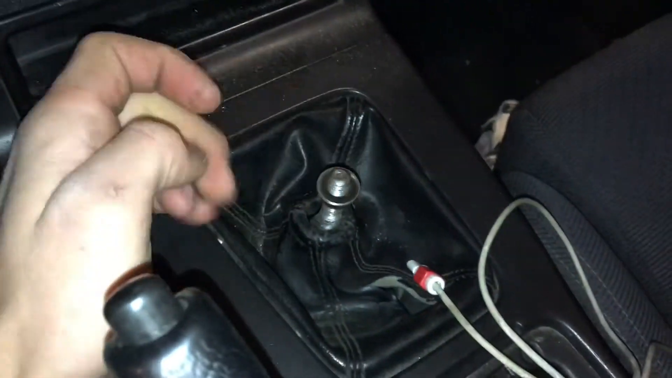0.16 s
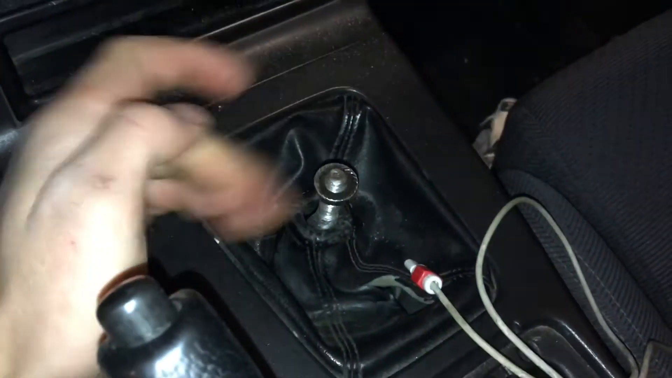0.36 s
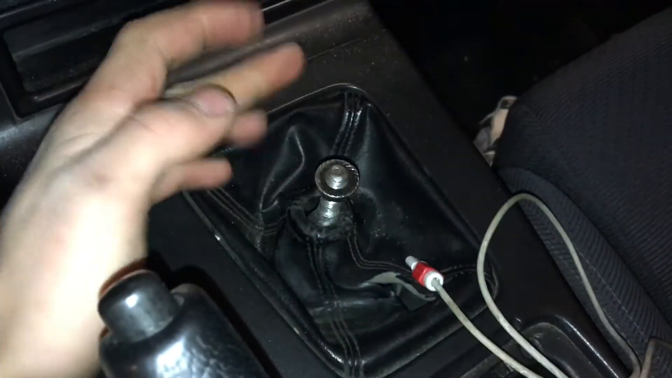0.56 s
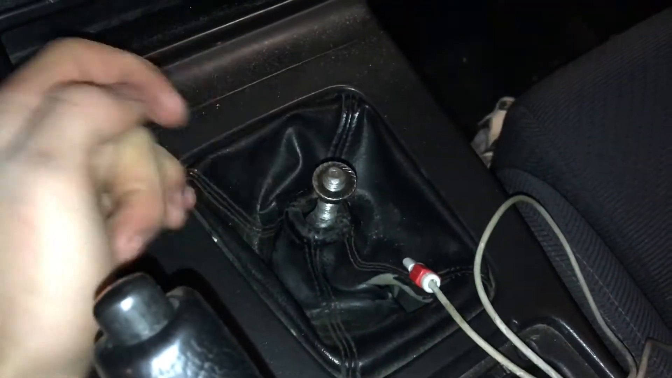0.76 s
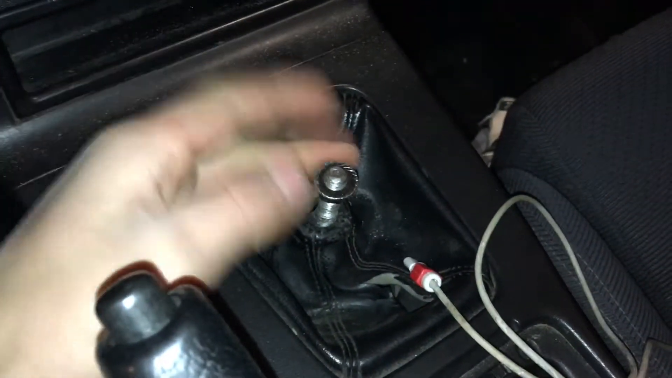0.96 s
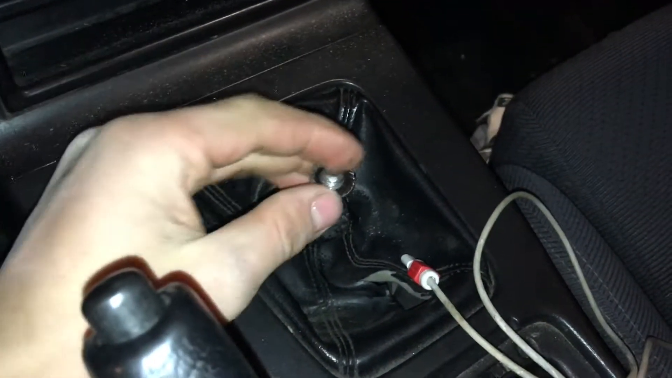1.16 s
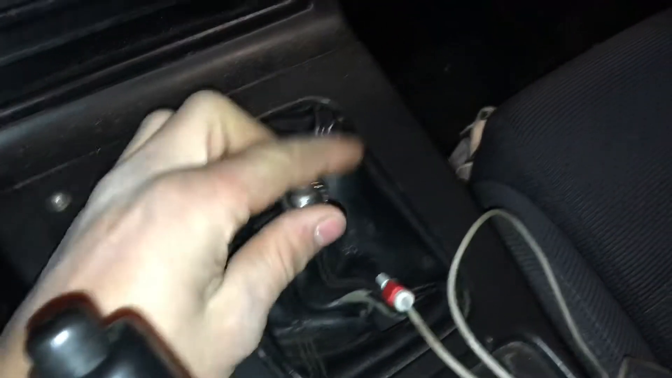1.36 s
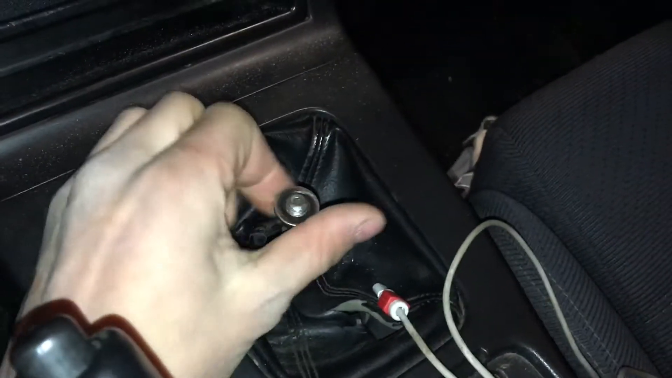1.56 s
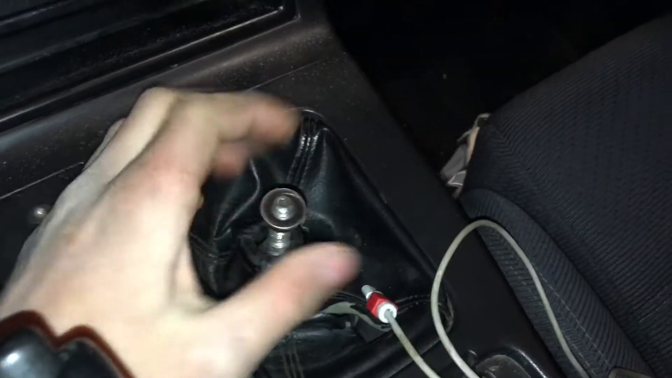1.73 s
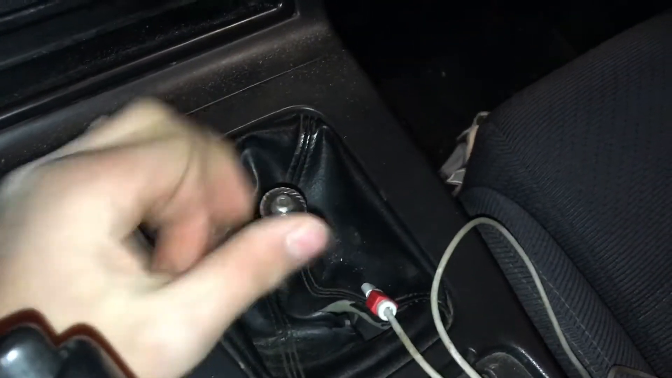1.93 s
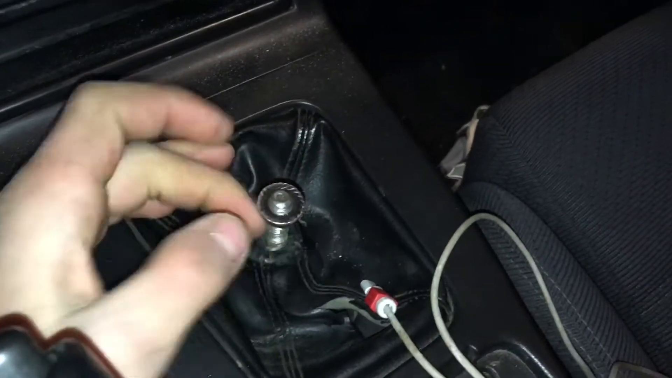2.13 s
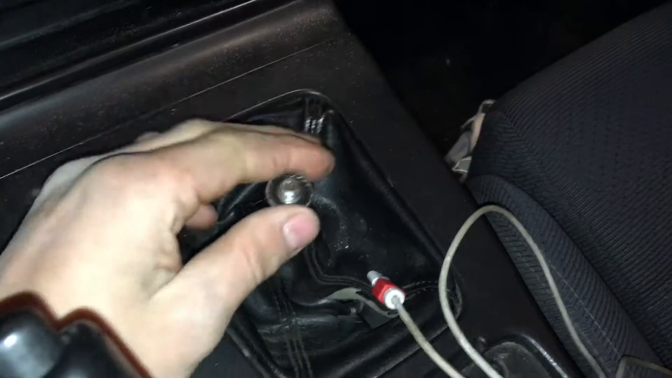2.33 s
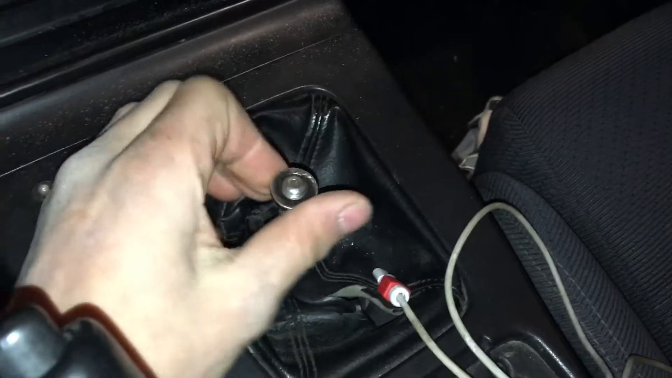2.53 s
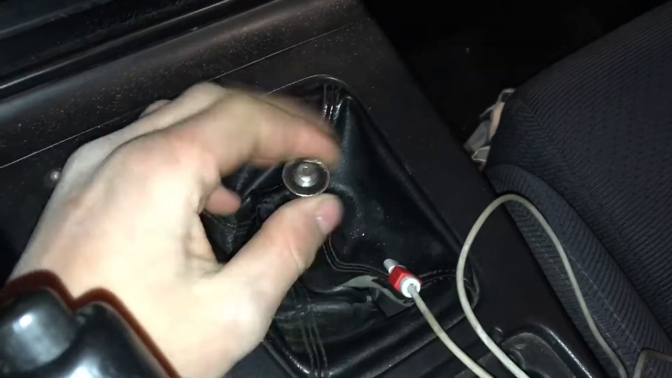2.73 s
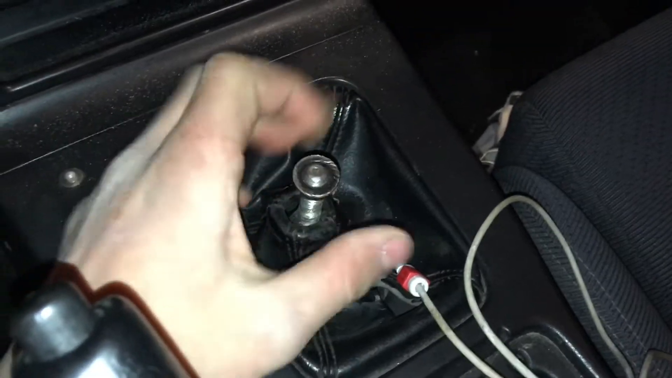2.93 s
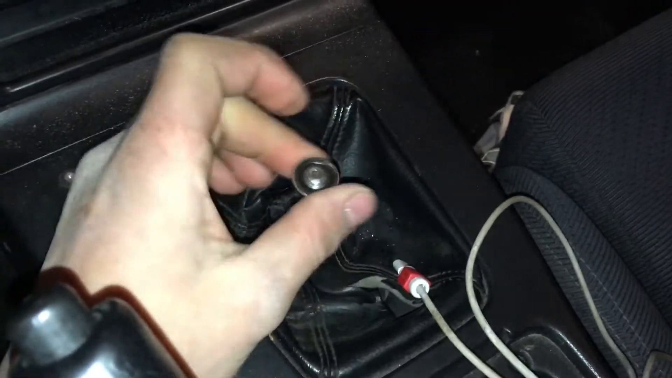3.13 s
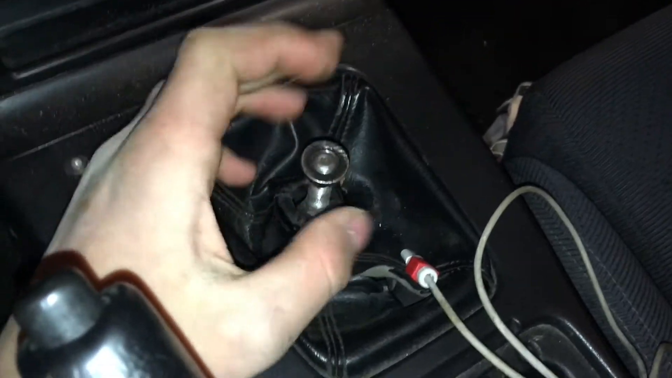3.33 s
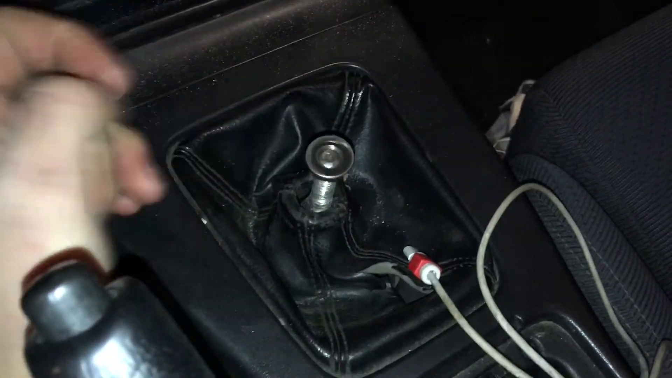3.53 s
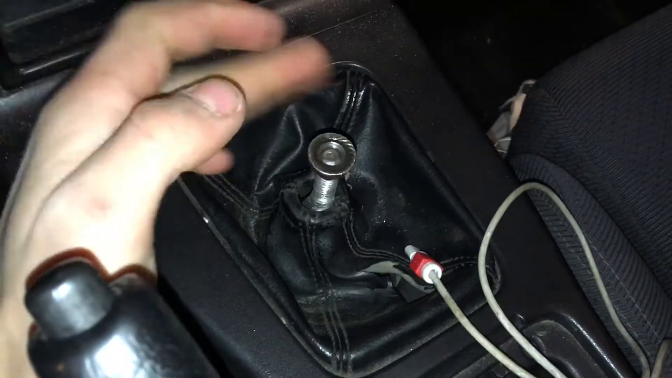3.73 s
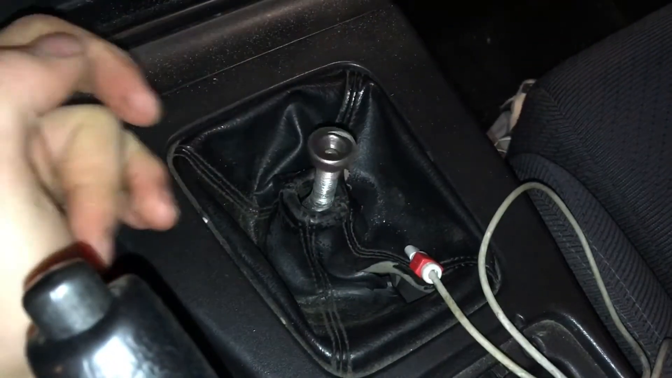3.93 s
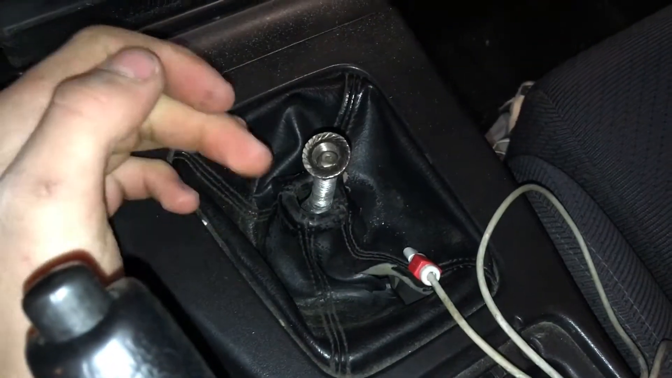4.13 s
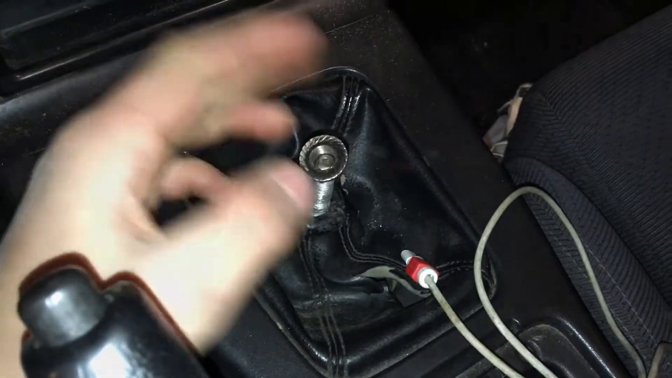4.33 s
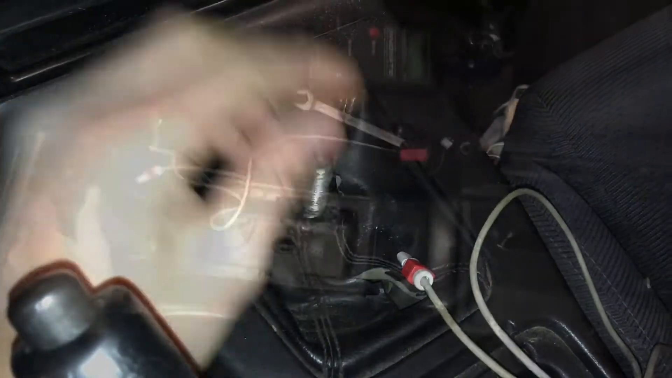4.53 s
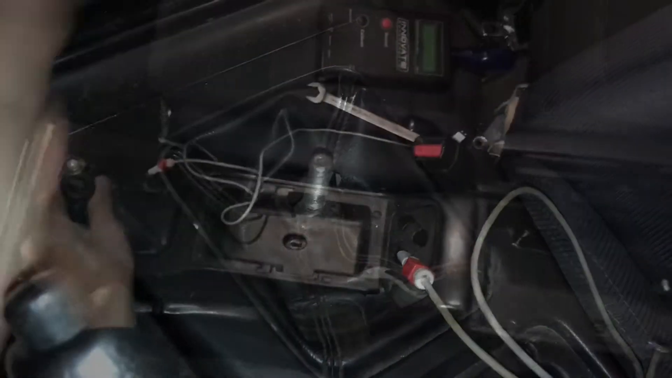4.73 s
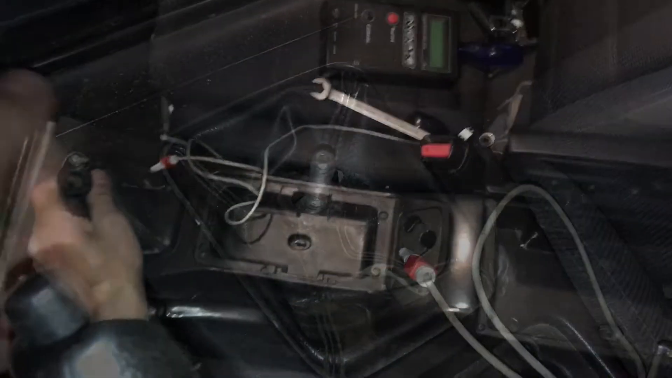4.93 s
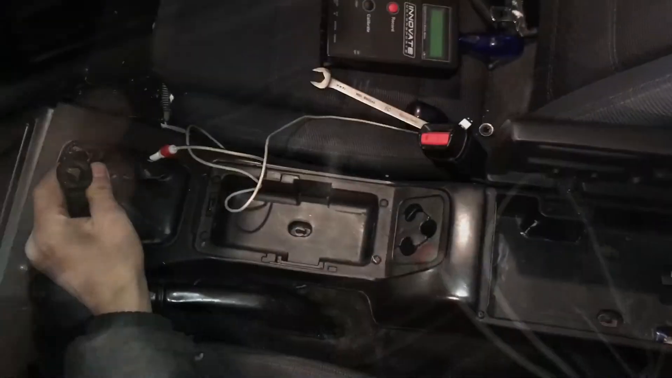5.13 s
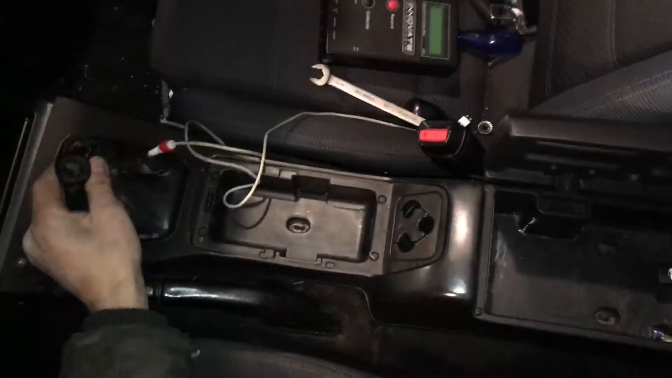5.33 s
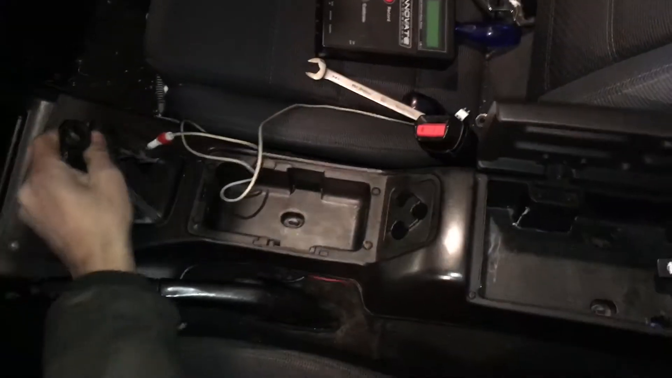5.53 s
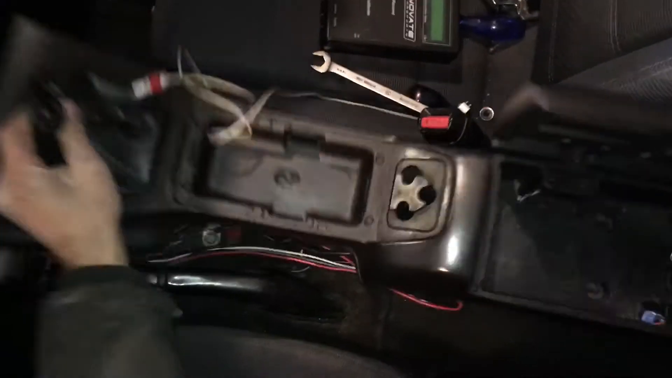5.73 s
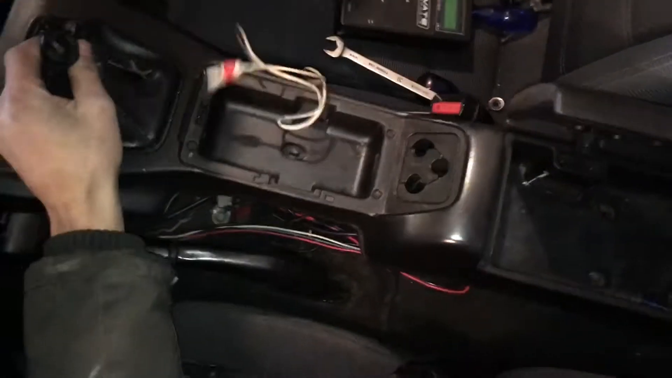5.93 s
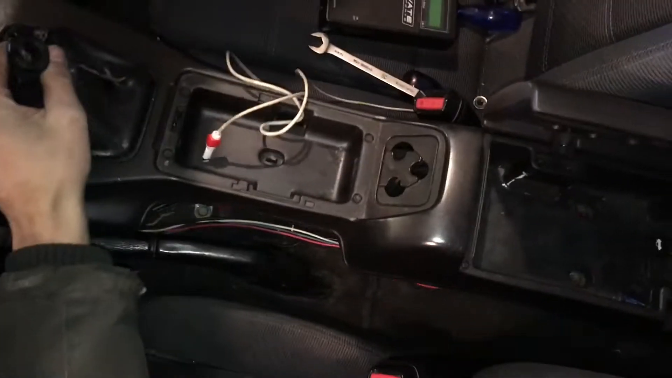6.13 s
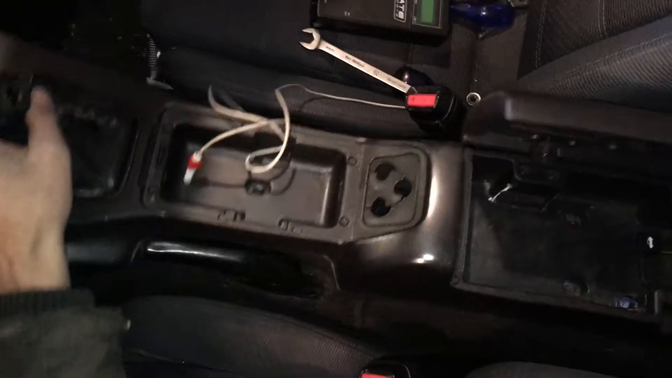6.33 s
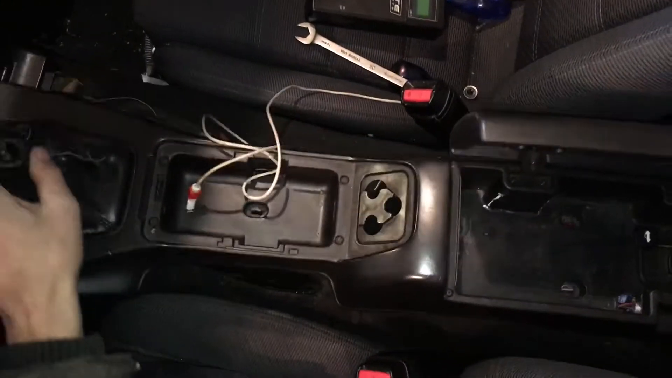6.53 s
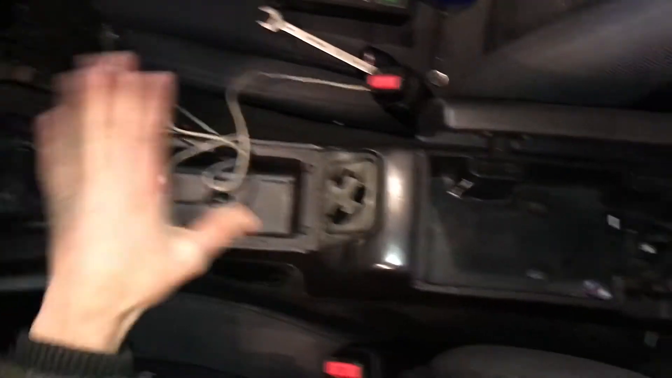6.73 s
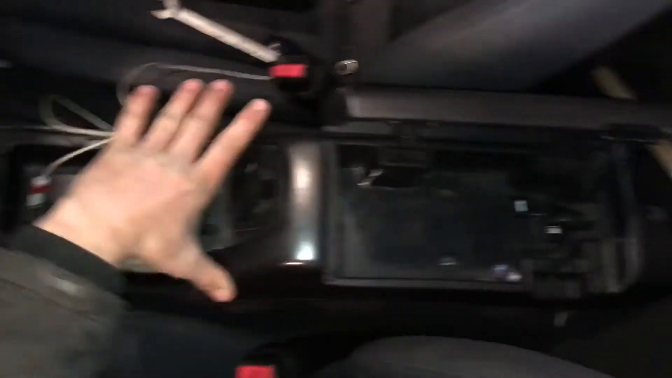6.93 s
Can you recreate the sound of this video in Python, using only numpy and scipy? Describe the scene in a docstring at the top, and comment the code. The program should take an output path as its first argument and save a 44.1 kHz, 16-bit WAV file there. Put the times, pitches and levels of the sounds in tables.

```python
"""A small steel collar ticks and rasps as fingers spin it on the threaded gear lever of a parked car.
Each tick is a burst of noise plus ringing steel; the rasp is noise shaped by many tiny slips.
Then the plastic centre console is tugged: it drags, jolts free, its retaining clips snap, an edge creaks
and it drops back with a thud, made from rubbing noise, knocks and low ringing tones.
The padded cabin answers briefly; fingers brush past; a hand-held camera adds low rumble and hiss."""
import sys
import numpy as np
from scipy import signal
from scipy.fft import rfft, irfft, next_fast_len
from scipy.io import wavfile
from scipy.ndimage import uniform_filter1d, minimum_filter1d, map_coordinates

SR = 44100
rng = np.random.default_rng(int(sys.argv[2]) if len(sys.argv) > 2 else 0)


def inscribe(sig):
    """Save sig as 16-bit PCM at rate SR to the path in sys.argv[1].

    A 1-D sig is mono; a 2-D sig holds one channel per row.
    Samples are clipped to [-1, 1] before scaling.
    """
    pcm = np.round(np.clip(np.atleast_2d(sig).T, -1, 1) * 32767)
    wavfile.write(sys.argv[1], SR, pcm.astype(np.int16))


N = 311586  # samples, about 7 seconds

# Levels in the tables are starting values: the functions add fixed trims and random variation.
# the collar is flicked or catches on the thread: start_s, level_db, pitch_hz, tilt_db_per_octave, ring_db
COLLAR_TICKS = [(.099, -36.5, 7040, -16, -23), (0.186, -23.5, 5640, 0, 11), (0.3597, -33.5, 5300, -11, -8),
                (1.6517, -26, 6600, -7, 22), (1.704, -29, 5500, -2.5, 6), (1.7891, -25, 6740, -3, 0.5),
                (1.881, -27.5, 6600, -4, -9.5), (2.5512, -38, 6570, -5, -2), (2.707, -20, 6680, -6, -2.5),
                (2.7784, -33, 8550, -9, -1), (2.7905, -26, 5600, -5, -15), (2.851, -17, 6340, -3.5, -3),
                (3.0194, -36, 6570, -10, 1), (3.1478, -30.5, 8270, -9, 2), (3.1744, -13.5, 5700, 0, 4),
                (3.1925, -18, 5530, 5, 12), (3.222, -18, 5600, 6, 2), (3.4018, -16, 6230, -3.5, -5.5),
                (3.483, -18.5, 5570, 8, 1), (3.7698, -14, 6970, -3, -9.5), (3.8284, -17.5, 5700, -3, -1.5),
                (3.84, -16.5, 5650, 5, -13), (3.8864, -21.5, 5700, -4.5, 3), (3.9571, -18.5, 6300, -3.5, 5),
                (4.4873, -17.5, 6360, 1, -1)]
# blows on the plastic console: start_s, level_db, treble_db (higher is brighter), pitch_hz
CONSOLE_KNOCKS = [(0.901, -41.5, -30, 1110), (.997, -31.5, -20.5, 732), (1.154, -46.5, -40, 700),
                  (1.94, -35.5, -27, 886), (2.452, -39.5, -23.5, 1226), (2.963, -34.5, -17.5, 1260),
                  (3.045, -43, -12, 1425), (3.298, -42, -30, 1260), (4.367, -42.5, -29, 1070),
                  (4.552, -33, -39, 463), (4.561, -38.5, -9, 580), (4.743, -37, -38, 407),
                  (4.893, -32, 1, 446), (4.987, -37, -29, 537), (5.081, -27.5, -17, 415),
                  (5.122, -34.5, -7, 1730), (5.203, -20.5, -12, 1980), (5.389, -28, -52, 480),
                  (5.449, -24, -31, 1030), (5.483, -25.5, -29, 1060), (5.505, -20, -10.5, 1317),
                  (5.53, -25.5, -24, 490), (5.561, -22.5, -13, 2174), (5.661, -16.5, -28.5, 1035),
                  (5.675, -12.5, -13, 2280), (5.687, -16, -14, 392), (5.698, -12, -20, 430),
                  (5.714, -15.5, -17, 1320), (5.75, -10, -14.5, 1307), (6.283, -32, -16.5, 1370),
                  (6.464, -21, -24, 1133), (6.471, -16.5, -25.5, 1940), (6.484, -18.5, -32.5, 687),
                  (6.495, -5.5, -18.5, 834), (6.889, -29, -28, 987), (6.942, -29.5, -24, 1164)]
# retaining clips let go: start_s, level_db, tilt_db_per_octave, ring_db
CLIP_SNAPS = [(5.9116, -25.5, -8.5, -2), (5.957, -29, -18, -10.5), (5.9638, -8.5, -1.5, -9.5),
              (6.023, 0, 1, -0.5), (6.0643, -16.5, -3.5, 2), (6.241, -37, -10, 2)]
# the whole console is shoved: start_s, level_db
CONSOLE_THUMPS = [(0.44, -40), (.705, -37), (0.971, -36), (1.634, -37), (1.914, -35.5), (1.984, -39.5),
                  (2.977, -39), (3.773, -45), (4.552, -45), (5.003, -34), (5.68, -9.5), (5.713, -15.5),
                  (5.753, -21), (6.496, -15.5), (6.524, -14), (6.927, -30.5)]

# ringing tones of the steel collar: pitch_hz, level_db, decay_s (time to fall 60 dB)
STEEL_MODES = [(1344, -18.5, 0.06), (4600, -21, 0.0045), (5720, -20, 0.12), (6490, -10, 0.047),
               (8400, -22, 0.055)]
# ringing tones of a retaining clip: pitch_hz, level_db, decay_s
CLIP_MODES = [(1046, -14, .05), (1295, -12, .055), (1975, 3, .04), (2465, 2, .045), (2757, -8, .04),
              (3860, -8, .04), (6900, -6, .03)]
# low ringing tones of the hollow console: pitch_hz, level_db, decay_s
SHELL_MODES = [(61.8, -0.5, 0.2), (81.5, 1, .12), (152, -2, 0.22), (190.7, -12.5, 0.24),
               (270.4, -11.5, 0.18), (365.2, -16.5, 0.13), (449, -24, 0.048)]

# tone colour of steel on steel: frequency_hz, level_db
TICK_COLOUR = [(100, -33), (500, -26.5), (950, -21), (1350, -8), (2700, -9), (4200, -0.5), (6500, 1.5),
               (9500, 4), (12500, 0.5), (16000, -4)]
# tone colour of plastic on plastic: frequency_hz, level_db
KNOCK_COLOUR = [(30, -22.5), (100, -8), (250, -14), (430, -8.5), (620, -8.5), (1100, -6.5), (2000, -7),
                (3000, -7), (5000, -12.5), (6500, -9.5), (9000, -13), (13000, -12.5), (16000, -17)]
# tone colour of a clip snapping: frequency_hz, level_db
SNAP_COLOUR = [(100, -35.5), (600, -23.5), (1000, -3.5), (1600, -9.5), (2200, -1), (2700, -1.5), (3500, -5),
               (5300, -10.5), (7000, -5.5), (10000, -9.5), (14000, -11), (16000, -18.5)]
# tone colour of the collar rubbing on its thread: frequency_hz, level_db
THREAD_COLOUR = [(200, -41), (480, -22), (650, -10), (1000, -13.5), (1350, -3), (2200, -11.5), (3800, -10),
                 (5000, -16), (5450, -2.5), (5750, -3.5), (6150, -7), (7400, -17), (8800, -18),
                 (16000, -31)]
# tone colour of the console dragging: frequency_hz, level_db
DRAG_COLOUR = [(120, -9.5), (220, 1.5), (440, 0), (660, -15.5), (1200, 2.5), (1700, -7.5), (2800, -6.5),
               (4500, -17.5), (7000, -21), (12000, -20.5), (16000, -33.5)]
# tone colour of the creaking edge: frequency_hz, level_db
CREAK_COLOUR = [(800, -18), (1750, -17), (2020, -1), (2250, -14), (2550, -12.5), (3000, -19), (6000, -28.5)]
# tone colour of skin and cloth: frequency_hz, level_db
SKIN_COLOUR = [(200, -8), (900, 5.5), (1500, 1), (4500, -3.5), (7000, -4), (12000, -3.5), (16000, -8.5)]

# the collar coasts after a flick: start_s, length_s, level_db, change_db (over the length)
SPINS = [(.125, .2, -60, -12), (1.65, 0.087, -64, -3), (3.15, 0.13, -49.5, -13), (3.48, 0.153, -61, -13.5),
         (3.806, .18, -55.5, -8), (4.465, 0.024, -54, -6)]
# the console is pulled over its mounts: start_s, length_s, level_db, change_db
DRAGS = [(4.68, 0.15, -63, 3), (5.06, 0.09, -50.5, -5.5), (5.385, 0.235, -46.5, 1),
         (5.669, 0.062, -15.5, -12.5), (5.75, .33, -41, -10.5), (6.08, .36, -57.5, 5.5),
         (6.495, 0.067, -23.5, -18), (6.86, 0.16, -45, -9)]
# the strained edge creaks: start_s, length_s, level_db, change_db
CREAKS = [(6.08, .21, -53.5, 9.5)]
# clear tones inside the creak: pitch_hz, level_db
SQUEAL_TONES = [(1995, -3.5), (2490, -10)]
# fingers and sleeve brush over leather and trim: peak_s, level_db, half_length_s
BRUSHES = [(0.152, -55.5, 0.05), (0.397, -54, 0.02), (0.704, -52.5, .012), (0.964, -59.5, 0.03),
           (1.324, -64, 0.04), (1.559, -56, 0.081), (1.918, -52.5, 0.0055), (2.002, -63, 0.055),
           (2.15, -53.5, 0.0033), (2.387, -59, 0.032), (2.916, -60, 0.022), (3.478, -48, 0.022),
           (3.79, -64, 0.12), (4.406, -56, 0.0043), (4.482, -40.5, 0.0052), (5.478, -45.5, 0.05),
           (5.695, -31.5, .023)]
# camera handling over time: time_s, sway_db, grip_db
HANDLING = [(0.0, -54, -60.5), (1.24, -54, -63), (1.46, -56, -63), (2.44, -51, -61.5), (2.81, -58.5, -60),
            (3.03, -56, -63), (3.84, -52.5, -59.5), (4.13, -59, -67), (4.78, -48, -56.5),
            (4.88, -56.5, -52), (5.37, -56, -55), (5.67, -37.5, -52), (5.82, -40.5, -52),
            (6.06, -50, -66.5), (6.24, -53, -57), (6.59, -48.5, -50.5), (6.97, -45, -59.5),
            (7.07, -45.5, -53.5)]

# tone colour of the swaying hand: frequency_hz, level_db
SWAY_COLOUR = [(15, -27), (30, -10), (55, 2), (80, -5.5), (100, -5.5), (125, -14.5), (250, -47.5)]
# tone colour of the gripping hand: frequency_hz, level_db
GRIP_COLOUR = [(60, -16), (115, -5), (160, -1.5), (250, -9.5), (400, -17), (520, -22.5), (800, -21.5),
               (2000, -39.5)]
# tone colour of the microphone hiss: frequency_hz, level_db
HISS_COLOUR = [(300, 0.5), (700, -5), (1400, -1.5), (2200, -4), (4800, -11.5), (6500, -11.5), (9000, -12.5),
               (12500, -7.5), (15000, -11.5), (16000, -9)]

TOP_HZ = 15850  # the final filter removes what lies above
BLOW_T = np.arange(SR // 3) / SR  # seconds since a blow
SPIN_ATTACK_S, SPIN_RELEASE_S = 0.017, 0.012
SPIN_SURGE_DB, SPIN_SURGE_PER_S = 3, 40  # the collar wobbles on the thread
# small ticks of a spin, relative to its level
RATTLE_PER_S, RATTLE_DB, RATTLE_SCATTER_DB = 35, 26.5, -1.5
RATTLE_HZ, RATTLE_TILT_DB_PER_OCTAVE, RATTLE_RING_DB = 5650, -5, 1
DRAG_ATTACK_S, DRAG_RELEASE_S = 0.0071, 0.013
# small knocks of a pull, relative to its level, and the ceiling on their level
BUMP_PER_S, BUMP_DB, BUMP_SCATTER_DB, BUMP_TOP_DB = 16, 7.5, 5, -26.5
BUMP_TREBLE_DB, BUMP_HZ, BUMP_SPREAD_OCTAVES = -24.5, 830, 0.92
CREAK_ATTACK_S, CREAK_RELEASE_S = 0.019, 0.022
SQUEAL_WAVER_HZ, SQUEAL_FLUTTER_DB = 27.5, 2.5
SWAY_DB, GRIP_DB, HISS_DB = 0.5, 1, -68  # the first two are added to the handling levels


def amp(db):
    """Turn decibels into gain."""
    return 10 ** (np.asarray(db) / 20)


def unit(x):
    """Scale to an rms (average strength) of 1."""
    return x / np.sqrt(np.mean(x ** 2) + 1e-20)


def along(points, hz):
    """Read a colour table between its points, on a log frequency axis."""
    f, v = np.transpose(points)
    return np.interp(np.log(hz + 1), np.log(f), v)


def wobble(rate):
    """A smooth random curve with this many random points a second."""
    knots = rng.standard_normal(int(N * rate / SR) + 4)
    return map_coordinates(knots, [np.arange(N) * rate / SR])


def coloured(x, points, tilt=0):
    """Filter to a tone colour without pre-echo; the tilt, in dB per octave, hinges near 700 Hz."""
    m = 2 * next_fast_len(len(x) // 2 + 2048)
    hz = np.fft.rfftfreq(m, 1 / SR)
    level_db = along(points, hz) + tilt * np.log2(1 + hz / 700)
    # folding the cepstrum makes the filter respond only after its input
    cepstrum = irfft(np.log(amp(level_db)))
    cepstrum[1:m // 2] *= 2
    cepstrum[m // 2 + 1:] = 0
    response = np.exp(rfft(cepstrum))
    return irfft(rfft(x, m) * response)[:len(x)]


def fade(t60):
    """A steady die-away after a blow, falling 60 dB in t60 seconds."""
    return np.exp(-np.log(1000) * BLOW_T / max(t60, 1e-3))


def blow(x):
    """Scale a blow so that its loudest few milliseconds peak near 1."""
    return x / np.sqrt(6 * uniform_filter1d(x ** 2, size=130).max())


def ring(modes, scatter_db, detune):
    """A struck body rings in fading tones, each with a slightly new strength and pitch."""
    out = np.zeros(len(BLOW_T))
    for hz, db, t60 in modes:
        strength, shift = rng.standard_normal(2)
        tone = np.sin(2 * np.pi * hz * (1 + detune * shift) * BLOW_T)
        out += amp(db + scatter_db * strength) * fade(t60) * tone
    return out


def crack(colour, tilt, t60, cabin_db, cabin_t60):
    """A blow shakes a part into quickly dying noise; the cabin adds a duller wash."""
    near, far = rng.standard_normal((2, len(BLOW_T)))
    wash = signal.lfilter([.6], [1, -.4], far)  # softens the treble
    noise = near * fade(t60) + amp(cabin_db) * wash * fade(cabin_t60)
    return blow(coloured(noise, colour, tilt))


def add(track, s, sound):
    """Mix a sound into the track at time s."""
    start = round(s * SR)
    track[start:start + len(sound)] += sound[:N - start]


def friction(colour, rate, slip_t60, smooth_db):
    """Rubbing is irregular slips of random size over a smooth rub, coloured by the body; rms 1."""
    slips = (rng.random(N) < rate / SR) * rng.exponential(size=N).clip(0, 3)
    force = unit(signal.fftconvolve(slips, fade(slip_t60))[:N]) + amp(smooth_db)
    return unit(coloured(force * rng.standard_normal(N), colour))


def strokes(rows, attack_s, release_s):
    """Rubbing strokes as gain: each rises, changes evenly in dB over its length, then dies away."""
    out = np.zeros(N)
    for start, length, db, change_db in rows:
        t = np.arange(N) / SR - start
        gate = np.clip(t / attack_s, 0, 1) * np.exp(-np.maximum(t - length, 0) / release_s)
        out += gate * amp(db + change_db * np.clip(t / length, 0, 1))
    return out


def chance_hits(rows, rate, scatter_db):
    """Small contacts, unevenly spaced through each stroke and following its level: start_s, level_db."""
    hits = []
    for start, length, db, change_db in rows:
        slip, size = rng.random(16), rng.standard_normal(16)
        times = (np.arange(len(slip)) + slip) / rate
        for t, a in zip(times, size):
            if t < length:
                hits.append((start + t, db + change_db * t / length + scatter_db * a))
    return hits


def background():
    """The hand sways and grips the camera, an uneven rumble over a steady microphone hiss."""
    colours = (SWAY_COLOUR, GRIP_COLOUR, HISS_COLOUR)
    sway, grip, hiss = (unit(coloured(rng.standard_normal(N), colour)) for colour in colours)
    times, *columns = np.transpose(HANDLING)
    sway_db, grip_db = (np.interp(np.arange(N) / SR, times, column) for column in columns)
    sway = sway * amp(sway_db + SWAY_DB + 1.5 * wobble(27))
    grip = grip * amp(grip_db + GRIP_DB + 2.6 * wobble(17))
    return sway + grip + amp(HISS_DB) * hiss


def fingers():
    """Skin and cloth slide over leather and trim in soft swells of rubbing noise."""
    t = np.arange(N) / SR
    pressure = sum(amp(db) * np.exp(-.5 * ((t - s) / half) ** 2) for s, db, half in BRUSHES)
    return pressure * friction(SKIN_COLOUR, rate=400, slip_t60=.008, smooth_db=0)


def shell():
    """A shove sets the hollow console booming in its low tones; little sounds below 44 Hz."""
    out = np.zeros(N)
    for s, db in CONSOLE_THUMPS:
        swell = 1 - fade(0.037)
        boom = ring(SHELL_MODES, scatter_db=3.5, detune=0.014) * swell
        add(out, s, amp(db) * boom / np.abs(boom).max())
    return signal.sosfilt(signal.butter(5, 44, "high", fs=SR, output="sos"), out)


def dragging():
    """The console drags over its mounts in uneven slips."""
    drag = friction(DRAG_COLOUR, rate=130, slip_t60=.025, smooth_db=-5)
    return amp(-4) * strokes(DRAGS, DRAG_ATTACK_S, DRAG_RELEASE_S) * drag


def creaking():
    """One strained edge creaks: rubbing slips carry a squeal that wavers in pitch and level."""
    creak = friction(CREAK_COLOUR, rate=260, slip_t60=.012, smooth_db=-4)
    for hz, db in SQUEAL_TONES:
        pitch = hz + SQUEAL_WAVER_HZ * wobble(150)
        tone = np.sin(2 * np.pi * np.cumsum(pitch) / SR)
        creak = creak + amp(db + SQUEAL_FLUTTER_DB * wobble(90)) * tone
    return amp(-3.5) * strokes(CREAKS, CREAK_ATTACK_S, CREAK_RELEASE_S) * creak


def clips():
    """Each clip springs out with a sharp crack and a short hollow ring, with little bass."""
    out = np.zeros(N)
    for s, db, tilt, ring_db in CLIP_SNAPS:
        contact = crack(SNAP_COLOUR, tilt, t60=0.018, cabin_db=-7.5, cabin_t60=0.095)
        hollow = blow(ring(CLIP_MODES, scatter_db=1, detune=.006))
        add(out, s, amp(db + 1.5) * blow(contact + amp(ring_db) * hollow))
    return signal.sosfilt(signal.butter(2, 650, "high", fs=SR, output="sos"), out)


def knock(db, treble_db, hz):
    """Plastic hits plastic; treble_db sets how bright each contact is, and hz sets its hollow note."""
    tilt = .5 * (treble_db + 10)
    contact = crack(KNOCK_COLOUR, tilt, t60=0.046, cabin_db=-15.5, cabin_t60=0.2)
    modes = [(hz, 0, .04), (2.1 * hz, -6, .025), (3.5 * hz, -10, .018)]
    note = blow(ring(modes, scatter_db=1.5, detune=.01))
    squeeze = 1 - fade(0.00066 * amp(-treble_db / 2))  # duller contacts build up more slowly
    return amp(db) * blow(squeeze * (contact + amp(-3.5) * note))


def panel():
    """The console is tapped, knocks against its mounts and drops back."""
    out = np.zeros(N)
    for s, db, treble_db, hz in CONSOLE_KNOCKS:
        add(out, s, knock(db, treble_db, hz))
    return out


def console_bumps():
    """The sliding console also rattles in small dull knocks, each at its own random pitch."""
    out = np.zeros(N)
    for s, db in chance_hits(DRAGS, BUMP_PER_S, BUMP_SCATTER_DB):
        hz = BUMP_HZ * 2 ** (BUMP_SPREAD_OCTAVES * rng.standard_normal())
        add(out, s, knock(min(db + BUMP_DB, BUMP_TOP_DB), BUMP_TREBLE_DB, hz))
    return out


def tick(db, hz, tilt, ring_db):
    """Steel hits steel and rings, with one extra tone that depends on the point of contact."""
    contact = crack(TICK_COLOUR, tilt, t60=.014, cabin_db=-18, cabin_t60=.07)
    steel = blow(ring(STEEL_MODES + [(hz, 4, .018)], scatter_db=7.0, detune=0.0257))
    return amp(db - 3.5) * blow(contact + amp(ring_db) * steel)


def collar_rattle():
    """The spinning collar also rattles in faint steel ticks."""
    out = np.zeros(N)
    for s, db in chance_hits(SPINS, RATTLE_PER_S, RATTLE_SCATTER_DB):
        add(out, s, tick(db + RATTLE_DB, RATTLE_HZ, RATTLE_TILT_DB_PER_OCTAVE, RATTLE_RING_DB))
    return out


def collar():
    """The loose collar ticks when flicked and chatters along the thread as it coasts."""
    chatter = friction(THREAD_COLOUR, rate=230, slip_t60=.01, smooth_db=-7)
    surge = amp(10.5 + SPIN_SURGE_DB * wobble(SPIN_SURGE_PER_S))
    out = surge * strokes(SPINS, SPIN_ATTACK_S, SPIN_RELEASE_S) * chatter
    for s, db, hz, tilt, ring_db in COLLAR_TICKS:
        add(out, s, tick(db, hz, tilt, ring_db))
    return out


def scene():
    """All sources meet at one close microphone."""
    console = shell() + dragging() + creaking() + clips() + panel() + console_bumps()
    steel_collar = collar_rattle() + collar()
    return (background() + fingers() + console + steel_collar)[None]


def record(dry):
    """Peaks above 0.88 are smoothly turned down; a steep filter removes the highest treble."""
    needed = np.minimum(1, .88 / (np.abs(dry) + 1e-9))
    gain = uniform_filter1d(minimum_filter1d(needed, size=90), size=90)
    return signal.sosfilt(signal.ellip(10, .1, 90, TOP_HZ, fs=SR, output="sos"), gain * dry)


dry = scene()
out = record(dry)
inscribe(out)
```